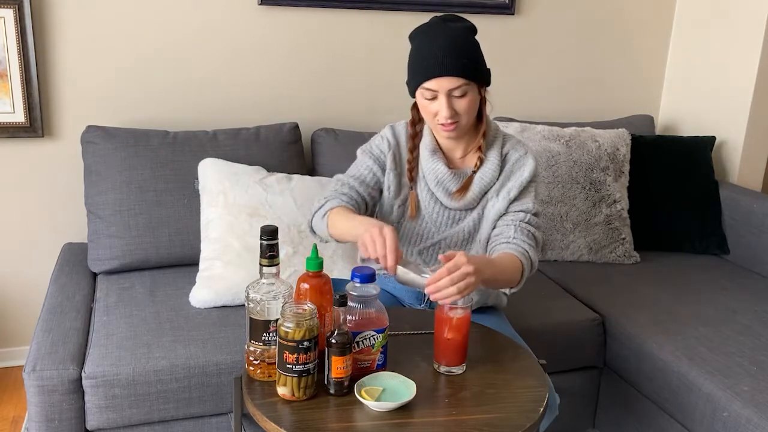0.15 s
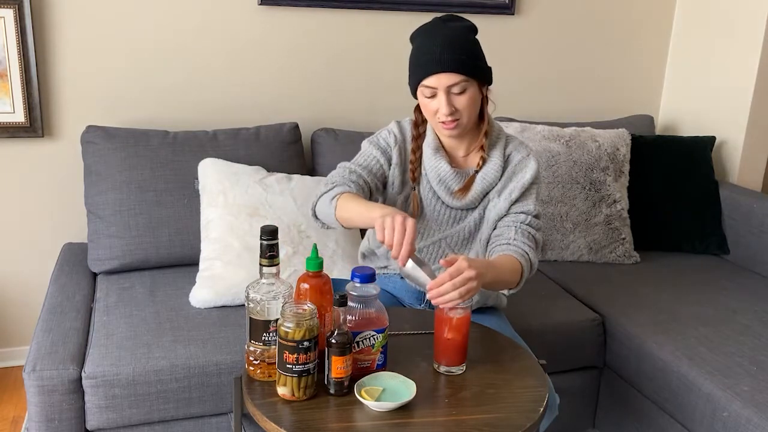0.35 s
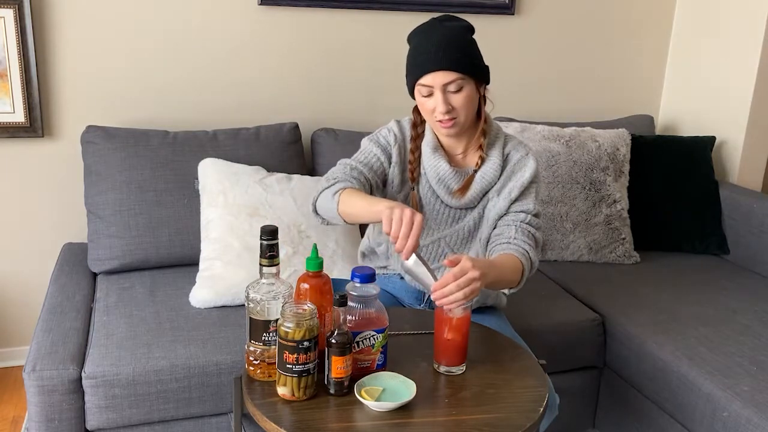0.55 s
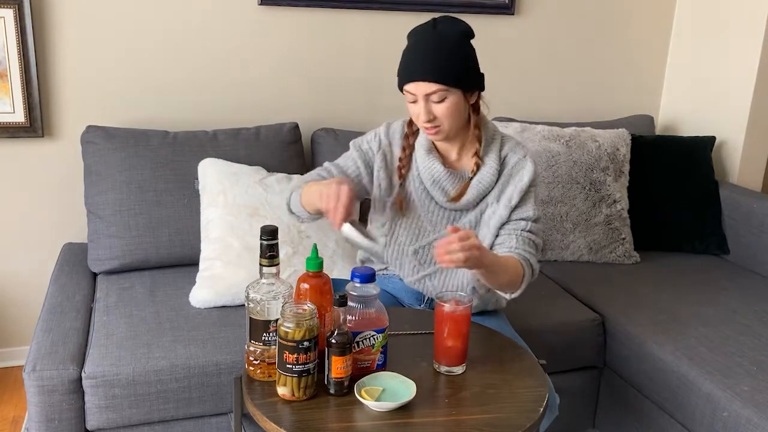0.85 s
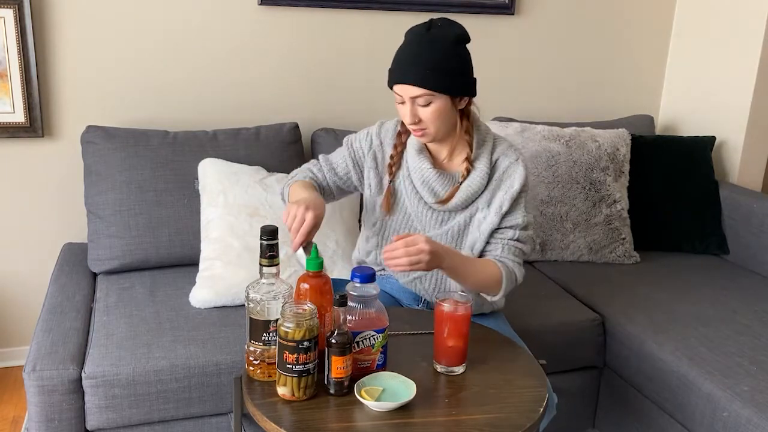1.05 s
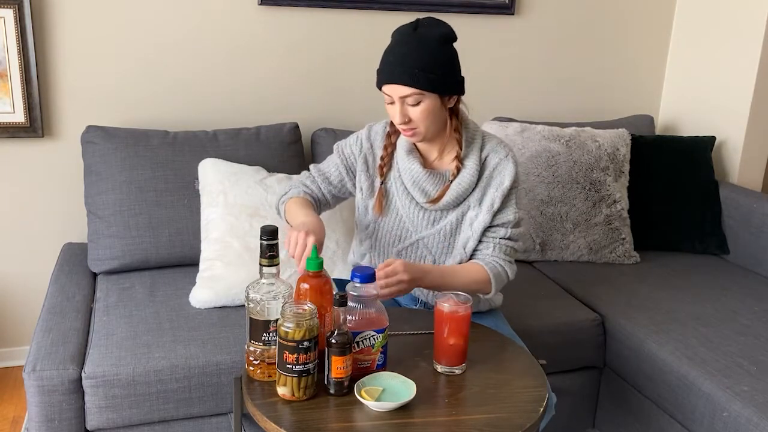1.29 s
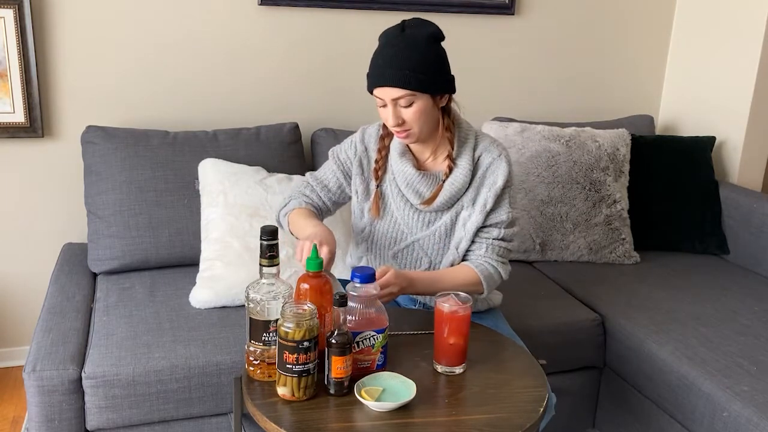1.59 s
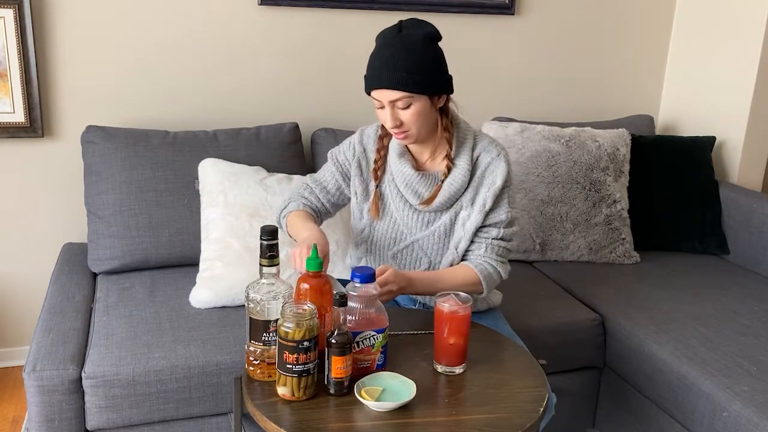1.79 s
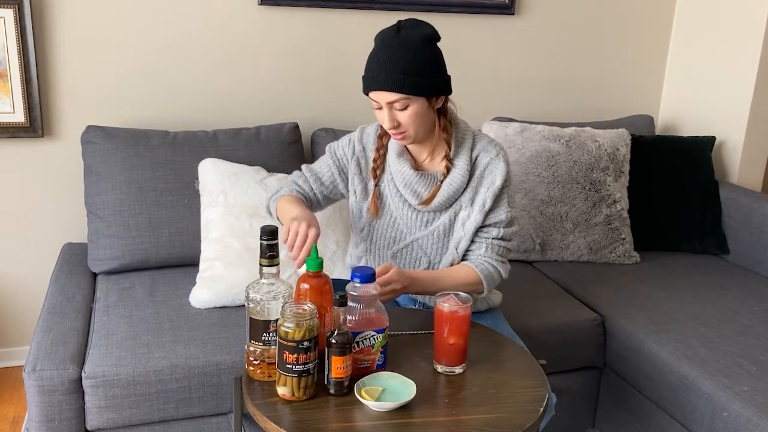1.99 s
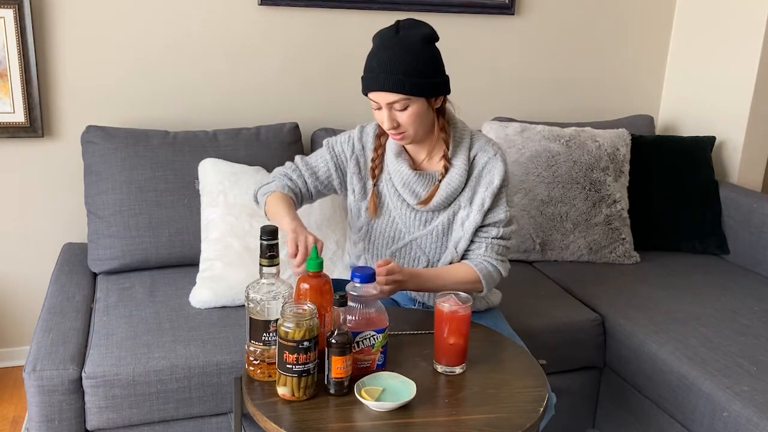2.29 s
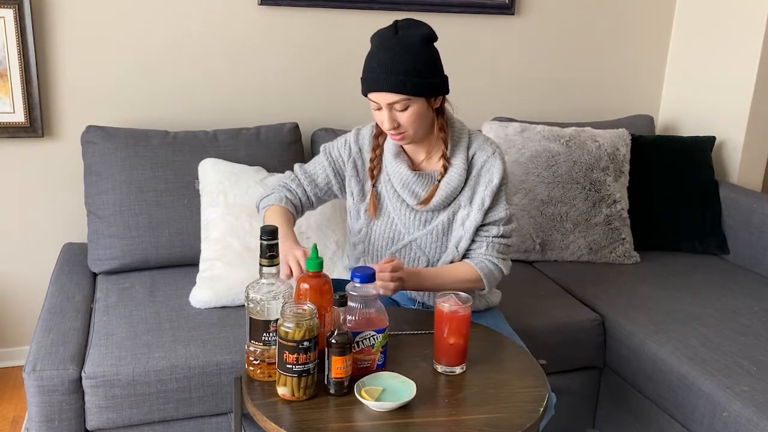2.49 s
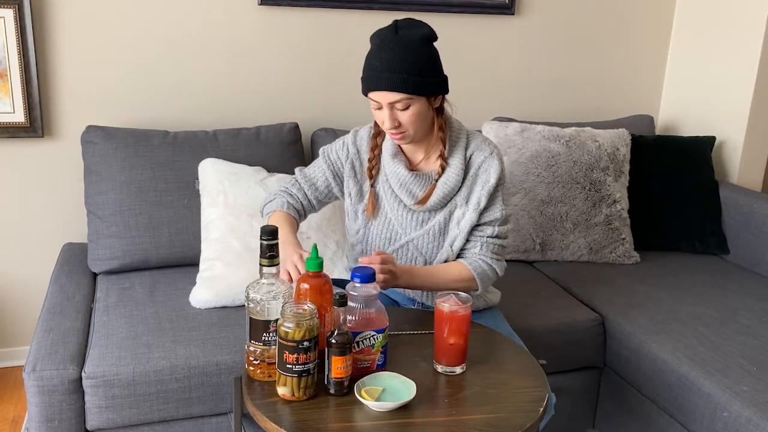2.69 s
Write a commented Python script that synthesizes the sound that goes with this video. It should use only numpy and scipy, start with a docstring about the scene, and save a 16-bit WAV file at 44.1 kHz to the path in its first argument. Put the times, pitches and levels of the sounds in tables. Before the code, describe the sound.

Ice cubes tumble from a metal scoop into a glass: sharp cracks at 0.2 s, a short slide and duller knocks from 0.4 to 0.65 s, faint ticks near 0.85 s. From 1.15 to 1.9 s the scoop digs through a bowl of ice, clacking and crunching, with a light steel ring at 1.9 s. A second dig rattles from 2.13 to 2.75 s, then quiet room hush.

```python
"""On a wooden table in a living room, ice cubes slide off a steel scoop into a glass;
then the scoop digs twice through a bowl of ice. Each knock is a noisy crack, a ringing cube, a ringing
glass or bowl, and a thud of the table. Digging and sliding are made of many tiny random contacts.
The struck scoop sings on as fading sine waves. The room adds an echo and a noise tail over a soft hush."""
import sys
import numpy as np
from scipy import signal
from scipy.fft import rfft, irfft, next_fast_len
from scipy.io import wavfile

SR = 44100
rng = np.random.default_rng(int(sys.argv[2]) if len(sys.argv) > 2 else 0)


def attenuation_scalar(level_db):
    """Turn a level in dB into a linear amplitude multiplier (20 dB per decade)."""
    decades = np.asarray(level_db, float) / 20
    return 10 ** decades


def inscribe(sig):
    """Save sig as 16-bit PCM at rate SR to the path in sys.argv[1].

    A 1-D sig is mono; a 2-D sig holds one channel per row.
    Samples are clipped to [-1, 1] before scaling.
    """
    pcm = np.round(np.clip(np.atleast_2d(sig).T, -1, 1) * 32767)
    wavfile.write(sys.argv[1], SR, pcm.astype(np.int16))


N = 125685  # length in samples

# Cubes falling into the glass: t/s, crack level/dB, clink level/dB, thud level/dB, pitch rung most f/Hz
GLASS_KNOCKS = [(.2056, -20.5, -32.5, -48, 4620), (.213, -36, -30.5, -39, 2250),
                (.419, -54, -38.5, -55, 2170), (.429, -32, -44, -53.5, 1500), (.4863, -26, -26, -27.5, 837),
                (.525, -50, -31, -31.5, 2800), (.602, -75, -43.5, -46, 700), (.6151, -46.5, -53, -76, 3760),
                (.646, -67, -58, -56.5, 3660), (.848, -51, -51, -61, 780), (.861, -63, -51, -69.5, 1310),
                (.884, -78, -53, -84, 1170)]
# Cubes knocked in the bowl: t/s, crack level/dB, clack level/dB, thud level/dB, pitch rung most f/Hz
BOWL_KNOCKS = [(1.1115, -64, -56.5, -55.5, 970), (1.16, -28.5, -30.5, -46, 2000),
               (1.171, -49, -29.5, -67, 1310), (1.205, -31.5, -32, -44.5, 1470),
               (1.2535, -23, -27, -44, 2140), (1.358, -37, -31.5, -43.5, 915), (1.405, -33, -32, -43, 1070),
               (1.4465, -27, -32.5, -44, 1320), (1.564, -40, -40.5, -38.5, 2950),
               (1.592, -26, -21.5, -44, 1500), (1.601, -37.5, -30.5, -50, 1220),
               (1.61, -32.5, -26.5, -42, 1560), (1.694, -49, -42, -42, 1240),
               (1.7685, -34.5, -35.5, -46, 900), (1.844, -38, -37, -39.5, 1080),
               (1.886, -33, -36.5, -42.5, 1060), (2.1332, -33, -47, -53.5, 5700),
               (2.157, -28.5, -29.5, -44, 2900), (2.166, -65, -30, -45.5, 1070),
               (2.224, -47, -42, -43, 690), (2.232, -43, -35, -51, 5900), (2.249, -32.5, -32, -43, 2830),
               (2.277, -34.5, -27.5, -40.5, 1420), (2.335, -40, -35.5, -52, 1160),
               (2.353, -27, -27.5, -47.5, 1410), (2.453, -43.5, -36.5, -55, 1030),
               (2.513, -26, -32, -60, 2800), (2.519, -22.5, -31.5, -47, 2800),
               (2.68, -46, -34.5, -50.5, 990), (2.73, -63, -39, -68, 1150)]
# The scoop struck free to ring: t/s, level/dB, share of its free decay time
SCOOP_PINGS = [(1.45, -52, 0.57), (1.89, -38.5, 0.86), (2.58, -54.5, 1), (2.728, -50, 0.32)]
# The scoop ploughing through the ice: t/s, crunch level/dB, crackle level/dB, rumble level/dB
DIGGING_LEVELS = [(1.15, -100, -79, -63), (1.21, -51, -62, -55), (1.25, -72, -73, -44.5),
                  (1.35, -69, -59, -57.5), (1.42, -42, -58.5, -49.5), (1.52, -64, -60.5, -51),
                  (1.58, -34, -51, -52.5), (1.66, -60, -78, -53), (1.72, -43.5, -51, -60),
                  (1.76, -54.5, -79, -55.5), (1.85, -50.5, -53, -49), (1.92, -42.5, -58.5, -51.5),
                  (2.02, -88, -86, -67), (2.13, -103, -102, -78), (2.2, -43.5, -52.5, -47),
                  (2.29, -46, -54.5, -56.5), (2.58, -82, -60.5, -53.5), (2.65, -60.5, -64, -59),
                  (2.74, -60, -74, -64), (2.85, -94, -78, -76)]
# Cubes sliding along the scoop: t/s, level/dB
SLIDING_LEVELS = [(.26, -76.5), (.38, -57.5), (.41, -61.5), (.425, -46), (.47, -65), (.55, -76.5)]

# Ringing tones of the glass: f/Hz, level/dB, time to fade by 60 dB t/s
GLASS_TONES = [(700, -11.5, .05), (812, 1.5, 0.014), (1094, 1.5, 0.033), (1960, 5, 0.0046),
               (2200, -8.5, 0.02), (2790, 0.5, 0.0082), (3052, -2, 0.0098), (3390, -10, 0.019),
               (4260, -8.5, 0.026), (5015, 2.5, 0.0082)]
# Resonances of the bowl: f/Hz, width f/Hz, level/dB
BOWL_RESONANCES = [(690, 50, 0), (970, 54, -4), (1098.6, 80, 6), (1190, 70, 0), (1303, 71, -0.5),
                   (1429, 81, 1), (1515, 90, 1.5), (1774, 160, 0), (2122, 72, -5), (2480, 127, -4.5),
                   (2872, 116, -7), (3266, 136, -7), (4160, 160, -10.5), (5900, 90, -6)]
# Tones of the table's thud: f/Hz, level/dB, time to fade by 60 dB t/s
TABLE_TONES = [(290.5, -7.5, 0.066), (317.9, 1, 0.075), (398, 3.5, 0.049), (482, -8, 0.084)]
# Tones of the free steel scoop: f/Hz, level/dB, time to fade by 60 dB t/s
SCOOP_TONES = [(1895, 3, 0.87), (3327, 9, 0.61), (5800, -1.5, 0.36)]
# Tones of one ice cube: f/Hz, level/dB, time to fade by 60 dB t/s
CUBE_TONES = [(5630, -6, 0.021), (5690, -8.5, 0.0088), (7150, 2.5, 0.0095), (7860, -3, 0.02),
              (10450, -2, 0.017), (11080, -2, 0.015)]

# Colour of cracking ice: f/Hz, level/dB
CRACK_COLOUR = [(760, -37.5), (1300, 2.5), (2000, -2.5), (5900, -11), (9000, -4.5), (15500, -10.5),
                (16600, -45.5)]
# Colour of the rumble while digging: f/Hz, level/dB
RUMBLE_COLOUR = [(35, -34), (60, -9), (145, -3), (221, -8.5), (311, -9.5), (344, -3.5), (700, -2.5),
                 (910, -5.5), (1540, -120)]
# Colour of the room's hush: f/Hz, level/dB
HUSH_COLOUR = [(20, -28), (58, -3), (137, -0.5), (180, 2), (222, -19.5), (703, -24.5), (8940, -38),
               (12000, -38), (15600, -72), (22000, -120)]

# How long the room's tail lasts: f/Hz, time to fade by 60 dB t/s
ROOM_FADE = [(200, 0.34), (1000, 0.36), (4000, 0.34), (12000, 0.17)]
# How alike the tail is at left and right: f/Hz, likeness (1 = the same)
ROOM_LIKENESS = [(200, 0.87), (800, 0.081), (4500, 0.03), (7000, 0.2), (9000, 1), (14000, 0.64)]
# Phase between the two microphone ports: f/Hz, left ahead of right/radians
PORT_PHASE = [(170, 0), (1200, -.3), (1700, -.9), (2240, .3), (3300, 1), (4500, 0), (5600, 1.9), (6900, 0),
              (8700, -2.9), (10000, -4.3), (13000, -9), (15700, -12.5)]
# Balance of the two microphone ports: f/Hz, left over right level/dB
PORT_BALANCE = [(100, 1), (1000, 3), (8000, 0)]


def unit(x):
    """Scale a sound to an rms (average strength) of 1."""
    return x / np.sqrt(np.mean(x ** 2) + 1e-20)


def along(points, hz):
    """Read a curve of (Hz, value) points, joined on a logarithmic pitch axis."""
    f, v = np.transpose(points)
    return np.interp(np.log(hz + 1), np.log(f + 1), v)


def curves(rows):
    """Join the rows into one smooth-running value per sample for each column after the time."""
    times, *columns = np.transpose(rows)
    return [np.interp(np.arange(N) / SR, times, column) for column in columns]


def filtered(x, response):
    """Filter a sound: multiply its spectrum by a response that depends on frequency."""
    size = next_fast_len(x.shape[-1] + 8192)  # spare room for the filter's ringing
    spectrum = rfft(x, size) * response(np.fft.rfftfreq(size, 1 / SR))
    return irfft(spectrum, size)[..., :x.shape[-1]]


def coloured(x, colour):
    """Give noise or grains a colour, at rms 1."""
    return unit(filtered(x, lambda hz: attenuation_scalar(along(colour, hz))))


def grains(per_s, spread_db):
    """Tiny contacts at random moments, of random sign and unequal size."""
    chance, size, sign = rng.random(N), rng.standard_normal(N), rng.standard_normal(N)
    return (chance < per_s / SR) * np.sign(sign) * attenuation_scalar(spread_db * size)


def ring(tones, t, attack_s, scatter_db, free=1):
    """A struck body rings as fading sine waves, slightly different each time; peak 1."""
    hz, db, t60 = np.transpose(tones)[:, :, None]
    level_draw, pitch_draw = rng.standard_normal((2, len(hz), 1))
    fade = attenuation_scalar(db + scatter_db * level_draw - 60 * t / (t60 * free))
    waves = fade * np.sin(2 * np.pi * hz * (1 + 0.0087 * pitch_draw) * t)
    x = waves.sum(0) * (1 - np.exp(-t / attack_s))
    return x / np.abs(x).max()


def ice_crack(t):
    """Cracking ice is a burst of coloured noise: a fast rise, an early drop, then a fade."""
    noise = coloured(rng.standard_normal(len(t)), CRACK_COLOUR)
    rise = 1 - np.exp(-t / 0.00078)
    early_drop = 0.33 + 0.82 * np.exp(-t / 0.0012)
    return noise * attenuation_scalar(-60 * t / 0.027) * rise * early_drop


def crumbling_contact(t, crack_db):
    """Ice crumbles where it touches: one big first push, then swelling and fading rough noise."""
    length_s = 0.0098 * attenuation_scalar(0.31 * (crack_db + 28))  # harder cracks crumble longer
    contact = rng.standard_normal(len(t)) ** 3 * np.exp(-t / length_s)
    contact *= 1 - np.exp(-t / 0.0015)
    contact[0] = 18  # the first touch
    return contact


def knocks(events, vessel_tones):
    """Each knock cracks, drives the cube and vessel through a crumbling contact, and thuds the table."""
    out, t = np.zeros(N + SR), np.arange(SR // 3) / SR
    focus_db = 15.5  # loss of a vessel tone one octave from the pitch rung most
    for start_s, crack_db, clink_db, thud_db, pitch in events:
        crack = ice_crack(t)
        focused = [(hz, db - focus_db * abs(np.log2(hz / pitch)), t60) for hz, db, t60 in vessel_tones]
        contact = crumbling_contact(t, crack_db)
        rings = [ring(CUBE_TONES, t, .0003, 4), ring(focused, t, .0006, 2.5)]
        # every push of the contact sets off the rings again
        cube, vessel = signal.fftconvolve(rings, contact[None], axes=1)[:, :len(t)]
        thud = ring(TABLE_TONES, t, .005, 1.5)
        sound = attenuation_scalar(crack_db) * (crack + attenuation_scalar(-8) * cube / np.abs(cube).max())
        sound += attenuation_scalar(clink_db) * vessel / np.abs(vessel).max()
        sound += attenuation_scalar(thud_db) * thud
        out[round(start_s * SR):][:len(t)] += sound
    return out[:N]


def bowl_response(hz):
    """The bowl boosts sound near its resonances; neighbours have opposite signs."""
    total = 0
    for k, (centre, width, db) in enumerate(BOWL_RESONANCES):
        damping = 1j * hz * width
        total = total + (-1) ** k * attenuation_scalar(db) * damping / (centre * centre - hz * hz + damping)
    return total


def digging():
    """Many small contacts ring the bowl and crackle, over a low rumble, while the scoop moves."""
    silence = (DIGGING_LEVELS[0][0] - .02, -120, -120, -120)
    crunch_db, crackle_db, rumble_db = curves([silence] + list(DIGGING_LEVELS))
    hits = grains(300, 4.5)
    crunch = attenuation_scalar(-1.0) * unit(filtered(hits, bowl_response))
    crackle = coloured(attenuation_scalar(-5) * unit(hits) + unit(grains(4000, 3)), CRACK_COLOUR)
    rumble = coloured(rng.standard_normal(N), RUMBLE_COLOUR)
    return attenuation_scalar(crunch_db) * crunch + attenuation_scalar(crackle_db) * crackle + attenuation_scalar(rumble_db) * rumble


def sliding():
    """Cubes scratch finely along the scoop: dense tiny contacts with the colour of cracking ice."""
    before = (SLIDING_LEVELS[0][0] - .01, -120)
    after = (SLIDING_LEVELS[-1][0] + 0.028, -120)
    level_db, = curves([before] + list(SLIDING_LEVELS) + [after])
    return attenuation_scalar(level_db) * coloured(grains(2500, 5), CRACK_COLOUR)


def scoop():
    """The steel scoop sings on after a light knock, for a share of its free decay time."""
    out, t = np.zeros(N + SR), np.arange(SR // 2) / SR
    for start_s, db, free in SCOOP_PINGS:
        out[round(start_s * SR):][:len(t)] += attenuation_scalar(db) * ring(SCOOP_TONES, t, .012, .5, free)
    return out[:N]


def pair(noises, likeness):
    """Mix two separate noises into left and right with a chosen likeness at each frequency."""
    def shares(hz):
        angle = np.arccos(np.clip(along(likeness, hz), -1, 1)) / 2
        return np.array([np.cos(angle), np.sin(angle)])

    mid, side = filtered(noises, shares)
    return np.array([mid + side, mid - side])


def room(x, size=4096):
    """A first echo off the table and a noise tail that dies band by band, redrawn every size samples."""
    out = np.zeros((2, N + SR))
    at_delay = round(.007 * SR)  # echo and tail start 7 ms late
    for start in range(0, N, size):
        hz, t, bands = signal.stft(rng.standard_normal((2, SR // 2)), SR, nperseg=256)
        fade = attenuation_scalar(-60 * t / along(ROOM_FADE, hz)[:, None])
        noises = signal.istft(bands * fade, SR, nperseg=256)[1]
        tail = pair(noises, ROOM_LIKENESS) * attenuation_scalar(-1.1) / np.linalg.norm(noises[0])
        tail[:, 0] += attenuation_scalar(-11.5)  # the first echo
        wet = signal.fftconvolve(x[None, start:start + size], tail, axes=1)
        at = start + at_delay
        out[:, at:at + wet.shape[1]] += wet
    return out[:, :N]


def hush():
    """The quiet room is steady coloured noise, partly alike at left and right."""
    noises = np.array([coloured(rng.standard_normal(N), HUSH_COLOUR) for _ in range(2)])
    return attenuation_scalar(-67) * pair(noises, [(100, 0.9), (1500, 0.17), (9000, 0.88)])


def scene():
    """Add up the glass, bowl, digging, sliding and scoop, then the room's answer and its hush."""
    # a narrower resonance rings longer: turn each width into a fading time
    bowl_tones = [(hz, db, np.log(1000) / np.pi / width) for hz, width, db in BOWL_RESONANCES]
    ice = knocks(GLASS_KNOCKS, GLASS_TONES) + knocks(BOWL_KNOCKS, bowl_tones) + digging() + sliding()
    ping = scoop()
    return ice + ping + room(ice + ping / 10) + hush()  # the ping reaches the room more weakly


def low_pass(x):
    """Removes everything above the highest recorded frequency."""
    return signal.sosfilt(signal.butter(12, 16970, fs=SR, output="sos"), x)


def record(dry):
    """Two close microphone ports hear the scene, each with its own phase and balance."""
    def ports(hz):
        phase = np.exp(.5j * np.outer([1, -1], along(PORT_PHASE, hz)))
        balance = attenuation_scalar(np.outer([.5, -.5], along(PORT_BALANCE, hz)))
        return phase * balance

    mix = filtered(dry, ports)
    return low_pass(mix)


dry = scene()
out = record(dry)
inscribe(out)
```